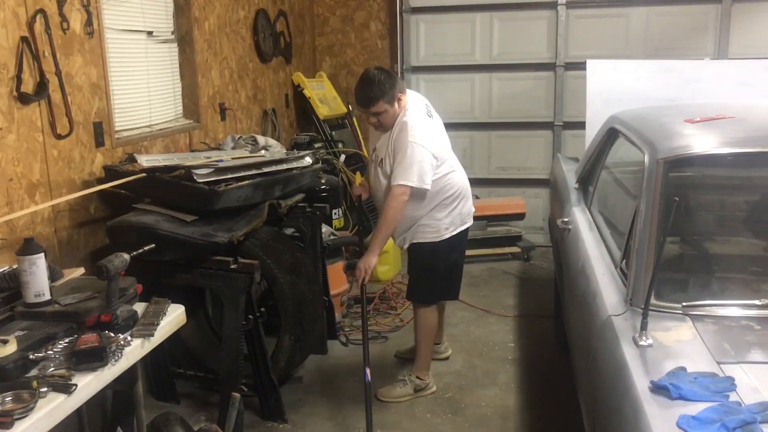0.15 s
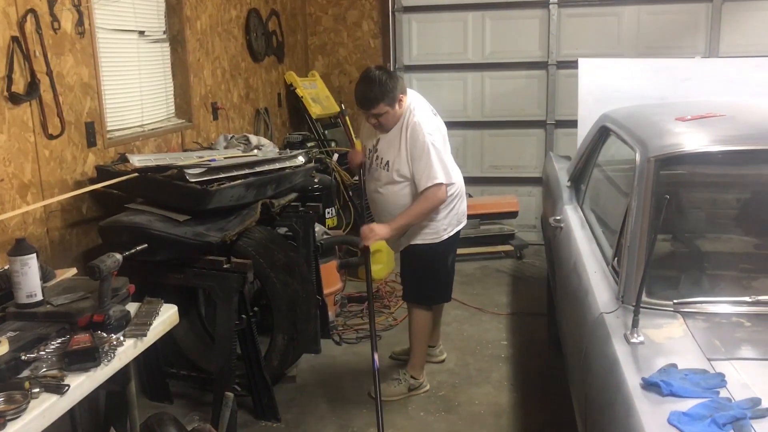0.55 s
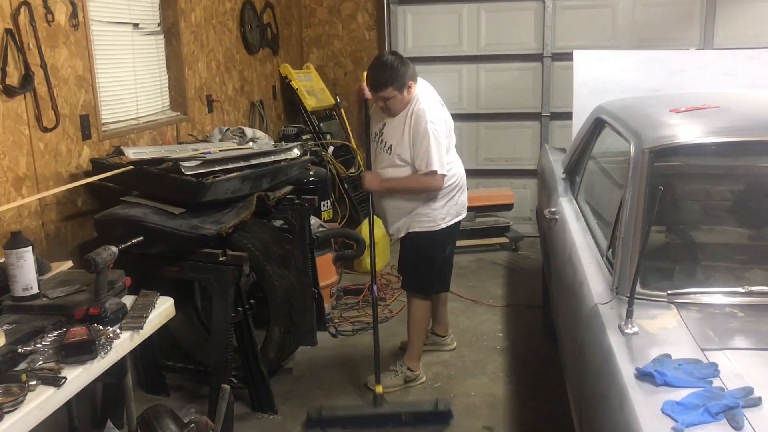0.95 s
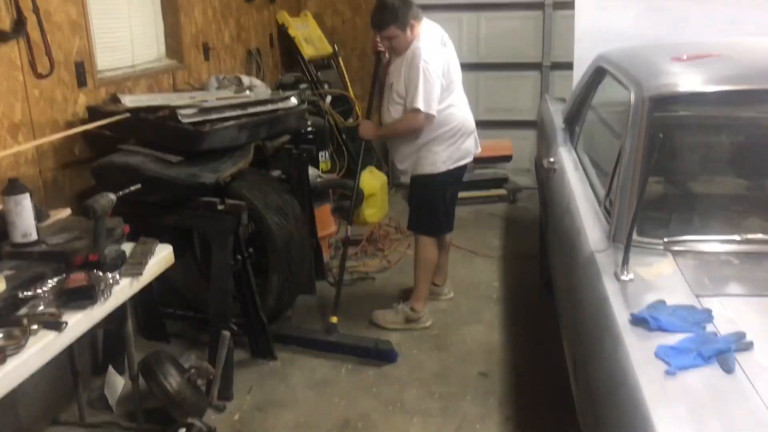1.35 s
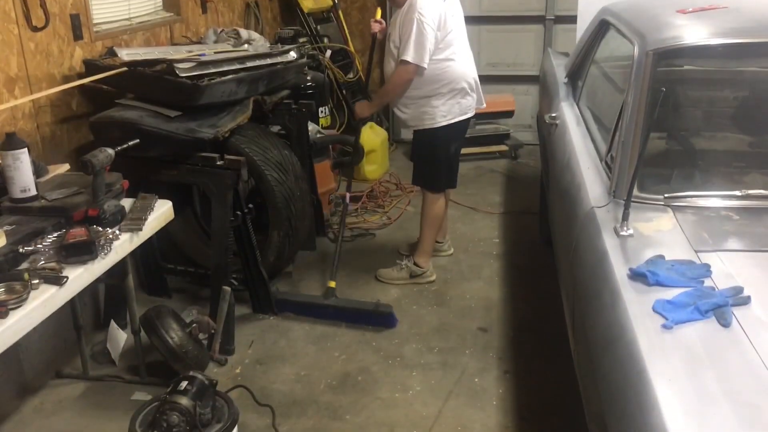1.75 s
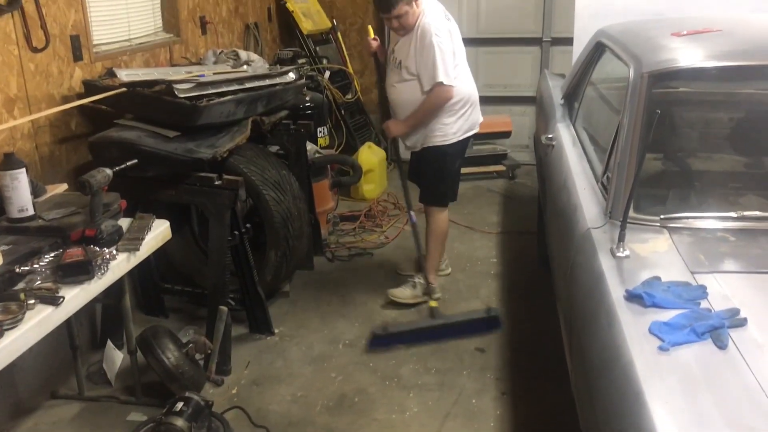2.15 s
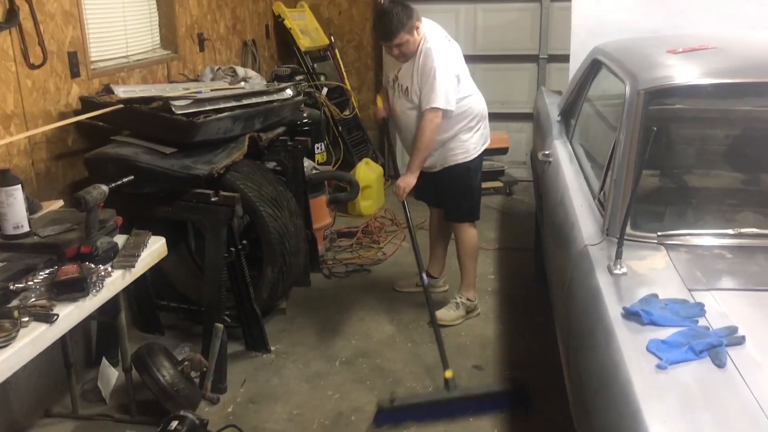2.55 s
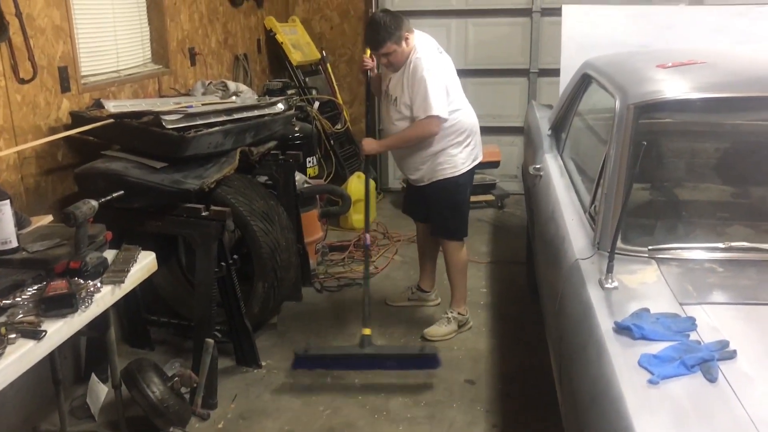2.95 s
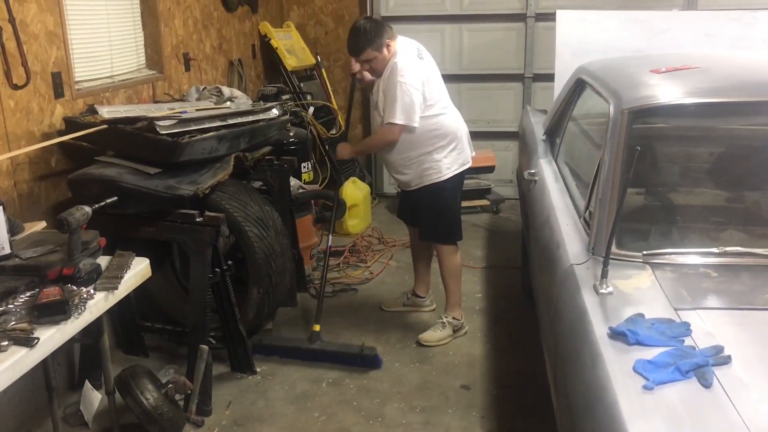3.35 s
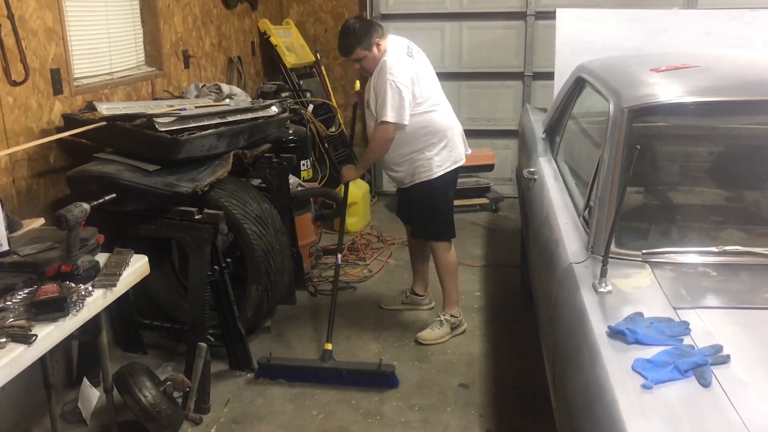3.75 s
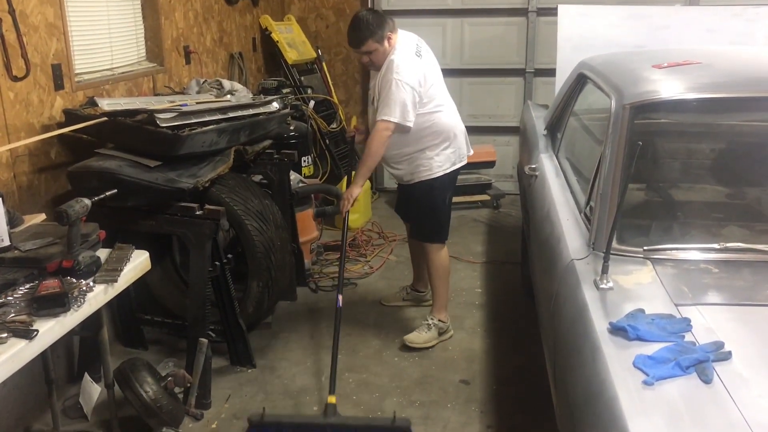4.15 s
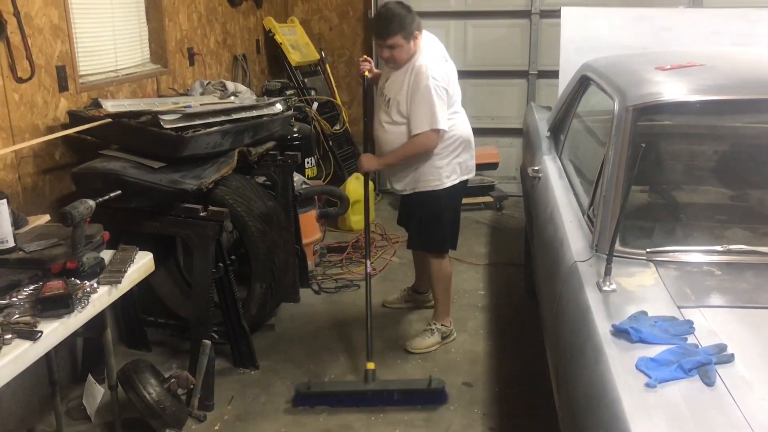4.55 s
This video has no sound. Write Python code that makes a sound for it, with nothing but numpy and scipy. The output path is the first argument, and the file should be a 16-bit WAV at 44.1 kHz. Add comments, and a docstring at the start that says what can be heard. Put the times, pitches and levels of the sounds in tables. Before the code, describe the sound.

One microphone in a hard, lightly echoing garage picks up a person sweeping. Three crisp, bright swishes of stiff bristles are spaced by quieter rasping drags. Bristles tick after the first; a hollow heel and gritty sole sound before the second; a sharper scuff follows later. The broom head finally smacks the floor. A low drone and a faint rising engine stay far behind.

```python
"""A stiff push broom sweeps a concrete garage floor: bristles catch and slip in hissing pushes and lighter
drags, as dense random impulses coloured by bands of hiss, tips and head. The head meets the floor in decaying
bursts of noise, and snapping bristles tick as resonances. The sweeper's heel rings as a set of modes, and soles
scuff on grit. Outside, a distant engine, a sine, climbs in pitch over a narrow-band drone and still air.
One microphone hears it all, with a small room's decaying-noise echoes around broom and shoes."""
import sys
import numpy as np
from scipy import signal
from scipy.fft import rfft, irfft, next_fast_len
from scipy.io import wavfile
from scipy.ndimage import uniform_filter1d, map_coordinates

SR = 44100
rng = np.random.default_rng(int(sys.argv[2]) if len(sys.argv) > 2 else 0)


def unload_wav(signal):
    """Save mono or channel-first audio to the path in sys.argv[1] as 16-bit WAV at rate SR, clipped to [-1, 1]."""
    wavfile.write(
        sys.argv[1],
        SR,
        np.round(np.clip(np.atleast_2d(signal).T, -1, 1) * 32767).astype(np.int16),
    )


N = 208063  # samples

# Spectra: columns f/Hz, relative level per Hz/dB
# Still air of the garage
AIR_SPECTRUM = [(15, -72), (25, -36), (44, -12.5), (70, -5.5), (166, -19), (270, -16.5), (317, -18),
                (416, -25), (451, -31.5), (591, -28), (659, -29), (1040, -29), (3430, -38), (4870, -43.5),
                (10000, -47.5), (16000, -43)]
# Soles on grit, before each scuff's shift in pitch
SOLE_SPECTRUM = [(150, -30), (450, -14.5), (850, -9.5), (1150, -0.5), (1500, -4), (2000, -3.5), (2400, -6),
                 (2900, -9.5), (4500, -20), (9000, -22), (15000, -23)]
# The head's weight on the slab
THUMP_SPECTRUM = [(30, -23), (78, 1), (135, -6), (185, -11), (260, -9.5), (450, -16), (900, -35)]
# Bristles striking the floor
CRASH_SPECTRUM = [(880, -22), (1500, -3.5), (1870, -10), (2060, -7), (2770, -11.5), (4290, -9), (6830, -13),
                  (7760, -20.5), (9470, -12.5), (10700, -16), (16000, -14.5)]
# Broom head scraping
SCRAPE_SPECTRUM = [(100, -40), (250, -12.5), (480, -14.5), (650, -12), (850, -5), (1120, -1), (1450, -4),
                   (1950, -1), (2500, -4), (3300, -7.5), (6000, -22)]
# Very tips of the bristles
TIPS_SPECTRUM = [(8500, -26.5), (10300, -5.5), (11200, 2), (12800, 2.5), (14200, 3), (15800, -3.5)]
# Bristles sliding
HISS_SPECTRUM = [(1500, -30), (2500, -7.5), (3050, -10), (3600, -4), (4150, -1.5), (4600, -4), (5050, -6),
                 (5900, -1.5), (6600, -4.5), (7700, -8.5), (9000, -5.5), (9900, -7.5), (10600, -14.5),
                 (12000, -40)]

# Modes: columns f/Hz, width/Hz, relative level/dB
# Heel of the shoe
HEEL_MODES = [(220.2, 140, -14), (338, 160, -3), (455, 69, -2), (597, 42, -1), (794, 150, -11),
              (3290, 260, -9)]
# Knock of the broom block
BLOCK_MODES = [(715, 200, -2.5), (945, 150, 2), (1220, 230, 4.5), (1410, 220, -1.5), (2210, 670, -12)]

# Distant engine: columns t/s, firing rate f/Hz, rms level/dB
ENGINE_COURSE = [(.4, 57.13, -72), (.5, 58.63, -57.5), (.9, 59.96, -54.5), (1.5, 67.27, -53),
                 (1.8, 72.35, -61.5), (2.4, 78.7, -61.5), (3.3, 86, -71)]
# Swelling and sinking low drone: columns t/s, level/dB
DRONE_LEVELS = [(0, -63.5), (1.5, -57.5), (2.6, -64), (3.12, -55), (3.27, -62), (3.46, -52), (3.9, -72),
                (4.6, -70)]
# Reverberation of the garage: columns f/Hz, t60/s
GARAGE_DECAY = [(150, 0.53), (1000, 0.62), (4000, 0.6), (8000, 0.28), (15000, 0.14)]
# One heel coming down: t/s, level/dB, t60/s
HEEL_STRIKE = (1.9146, -35.5, 0.15)
# Soles dragging over grit: columns t/s, level/dB, rise/s, t60/s, brightness (pitch ratio)
SOLE_SCUFFS = [(.74, -46.5, 0.08, 0.33, 0.65), (.863, -44.5, 0.018, 0.22, 0.71),
               (1.922, -39.5, 0.0071, 0.19, 0.83), (1.935, -33.5, 0.018, 0.13, 0.82),
               (2.97, -60, 0.001, .06, 1.2), (3.644, -41, .002, 0.3, 0.91), (3.665, -28, 0.0028, 0.15, 1.1),
               (3.69, -39.5, 0.073, 0.51, 0.98)]
# The head meeting the floor: columns t/s, crash level/dB, knock level/dB, thump level/dB
HEAD_LANDINGS = [(.634, -56, -52, -66), (3.2606, -42, -52.5, -73), (3.394, -44.5, -50, -58.5),
                 (4.6281, -34, -37.5, -58), (4.6417, -30, -37.5, -41.5)]
# Bent bristles snapping free: columns t/s, level/dB, f/Hz
BRISTLE_FLICKS = [(0.289, -29, 8450), (0.298, -32, 8700), (0.384, -31, 5560), (0.4074, -40, 10700),
                  (0.4274, -41, 5550), (0.4434, -41, 11000), (0.4584, -40, 9360), (0.526, -43, 5880)]
# Bristles that quiver and ring: columns t/s, level/dB, rise/s, t60/s, f/Hz, width of each of two passes/Hz
BRISTLE_RINGS = [(.33, -52.5, 0.054, 1, 7230, 500), (.35, -49, 0.05, 0.63, 9300, 800),
                 (.39, -49, 0.026, 0.5, 11140, 700), (3.48, -54, 0.031, 1, 6140, 900)]
# Light drags between pushes: columns start t/s, attack/s, end t/s, t60/s, hiss level at start/dB,
# swell/(dB/s), head scrape relative to hiss/dB, tips relative to hiss/dB
LIGHT_DRAGS = [(.628, 0.044, 0.83, .19, -45.3, -3, -3, 1.5), (.862, 0.014, 0.89, .18, -50, -6, 1, 2.5),
               (.94, 0.03, 1.046, 0.37, -64, -2, 4, -12), (1.228, 0.054, 1.32, 0.31, -47.5, -1, .5, -8),
               (1.3, .012, 1.515, .3, -53, 25.5, -2.5, 0.5), (1.44, .07, 1.555, 0.42, -49.5, 0.5, 1, -4),
               (1.6, .05, 1.72, .2, -61.5, 2, -7, -1), (1.679, 0.078, 1.997, 0.22, -50, 9, -4.5, -2),
               (2.022, 0.027, 2.42, 0.46, -42.5, -17, -4.5, -1.5),
               (3.26, 0.046, 3.32, 0.19, -48.5, -3, 3.5, -1), (3.395, .015, 3.46, 0.38, -53, 0, 6, 2.5),
               (3.455, 0.061, 4.04, .45, -43.5, -9, -11.5, -2), (4.36, .05, 4.87, .3, -75.5, 20, -2, 2)]
# Forward pushes: columns full speed from t/s, slowing from t/s, hiss level at full speed/dB,
# gain while speeding up/(dB/s), loss while slowing/(dB/s)
FORWARD_PUSHES = [(0.142, 0.237, -36.5, 16.5, 53), (2.585, 2.646, -35, 71.5, 162),
                  (4.158, 4.211, -35, 50.5, 152)]

AIR_DB = -59  # rms level
DRONE_HZ, DRONE_WIDTH_HZ = 60.8, 5.8
PUSH_SCRAPE_DB, PUSH_TIPS_DB = -8, -0.5  # relative to the hiss, at full speed
SCRAPE_GROWS, TIPS_GROW = 0.75, 1.25  # dB for each dB of hiss: a faster push is brighter
TOP_HZ = 15900  # upper band limit


def amp(db):
    """Level to amplitude: 20 dB is a factor of ten."""
    return 10 ** (np.asarray(db) / 20)


def unit(x):
    """Normalisation to an rms of 1."""
    return x / np.sqrt(np.mean(x ** 2) + 1e-20)


def along(points, hz):
    """Interpolation of (f/Hz, value) points on a logarithmic frequency axis."""
    f, value = np.transpose(points)
    return np.interp(np.log(hz + 1), np.log(f + 1), value)


def curves(rows):
    """Linear interpolation in time: one value per sample for each column after t/s."""
    s, *columns = np.transpose(rows)
    t = np.arange(N) / SR
    return [np.interp(t, s, column) for column in columns]


def wobble(rate):
    """Smooth random fluctuation: a spline through random knots, rate of them a second."""
    knots = rng.standard_normal(int(N * rate / SR) + 4)
    return map_coordinates(knots, [np.arange(N) * rate / SR])


def filtered(x, response):
    """Linear filtering: the spectrum of x multiplied by a response of frequency."""
    size = next_fast_len(N + SR // 2)
    spectrum = rfft(x, size) * response(np.fft.rfftfreq(size, 1 / SR))
    return irfft(spectrum, size)[:N]


def coloured(x, spectrum, shift=1):
    """Spectral shaping by a (f/Hz, level/dB) curve moved by a pitch ratio, at rms 1."""
    return unit(filtered(x, lambda hz: amp(along(spectrum, hz / shift))))


def resonant(x, modes):
    """Modal superposition: x rings through damped resonances of alternating sign, at rms 1."""
    def body(f):
        total = 0
        for k, (centre, width, db) in enumerate(modes):
            damping = 1j * f * width
            total = total + (-1) ** k * amp(db) * damping / (centre * centre - f * f + damping)
        return total
    return unit(filtered(x, body))


def grit(rate):
    """Stick-slip as shot noise: tiny slips of random size, rate a second, at steady power."""
    chance = np.clip(rate / SR, 1e-4, 1)
    slips = rng.random(N) < chance
    return slips * rng.standard_normal(N) / np.sqrt(chance)


def burst(s, rise, t60):
    """Exponential decay: a contact builds up linearly from time s, then loses 60 dB in t60."""
    t = np.arange(N) / SR - s
    fall_db = -60 * np.maximum(t - rise, 0) / t60
    return np.clip(t / rise, 0, 1) * amp(fall_db)


def background():
    """Phase accumulation: a sine follows the engine's firing rate, over resonant drone and coloured air."""
    firing_hz, engine_db = curves(ENGINE_COURSE)
    phase = 2 * np.pi * np.cumsum(firing_hz) / SR
    engine = amp(engine_db) * np.sqrt(2) * np.sin(phase)
    hum = resonant(rng.standard_normal(N), [(DRONE_HZ, DRONE_WIDTH_HZ, 0)])
    drone = amp(curves(DRONE_LEVELS)[0]) * hum
    air = amp(AIR_DB) * coloured(rng.standard_normal(N), AIR_SPECTRUM)
    return engine + drone + air


def garage(x):
    """Diffuse reverberation of broom and shoes: noise tails in which each frequency has its own decay."""
    hop = SR // 6
    out = np.zeros(N + 2 * SR)
    padded = np.pad(x, (hop, 2 * hop))
    fade = np.sin(np.pi * np.arange(2 * hop) / (2 * hop))  # overlapping pieces keep constant power
    for start in range(0, N + hop, hop):
        # a fresh noise tail for each short overlapping piece
        hz, t, z = signal.stft(rng.standard_normal(SR // 2), SR, nperseg=256)
        fall_db = -60 * t / along(GARAGE_DECAY, hz)[:, None]
        tail = signal.istft(z * amp(fall_db), SR, nperseg=256)[1]
        piece = padded[start:start + 2 * hop] * fade
        echo = signal.fftconvolve(piece, tail / np.linalg.norm(tail))
        out[start:start + len(echo)] += echo
    return out[hop - SR // 250:][:N]  # echoes start 4 ms late


def shoes():
    """Impact and friction: a heel's modes ring in a hollow clop; soles grind over loose grit."""
    s, db, t60 = HEEL_STRIKE
    clop = resonant(rng.standard_normal(N), HEEL_MODES)
    out = amp(db) * burst(s, rise=0.00086, t60=t60) * clop
    for s, db, rise, t60, brightness in SOLE_SCUFFS:
        out += amp(db) * burst(s, rise, t60) * coloured(grit(9000), SOLE_SPECTRUM, brightness)
    return out


def landings():
    """Impact excitation: the bristles crash onto the floor, the block knocks and its weight thumps."""
    crash = coloured(grit(18000), CRASH_SPECTRUM)
    knock = resonant(grit(20000), BLOCK_MODES)
    thump = coloured(rng.standard_normal(N), THUMP_SPECTRUM)
    out = np.zeros(N)
    for s, crash_db, knock_db, thump_db in HEAD_LANDINGS:
        out += amp(crash_db) * burst(s, rise=0.00039, t60=0.027) * crash  # first touch
        out += amp(crash_db - 2.5) * burst(s, rise=0.0022, t60=0.22) * crash  # the tufts splay
        out += amp(knock_db) * burst(s, rise=0.0035, t60=0.3) * knock
        out += amp(thump_db) * burst(s, rise=0.015, t60=0.64) * thump
    return out


def flicks():
    """Elastic release: single bristles spring back with a short, high tick; others swell and ring on."""
    out = np.zeros(N)
    for s, db, hz in BRISTLE_FLICKS:
        tick = resonant(rng.standard_normal(N), [(hz, 2200, 0)])
        out += amp(db) * burst(s, rise=0.0008, t60=0.019) * tick
    for s, db, rise, t60, hz, width in BRISTLE_RINGS:
        mode = [(hz, width, 0)]
        ring = resonant(resonant(grit(900), mode), mode)
        out += amp(db) * burst(s, rise, t60) * ring
    return out


def patchy(x, depth_db):
    """Time-varying colour: the spectrum drifts as the tufts meet new patches of floor."""
    z = signal.stft(x, nperseg=512)[2]
    field = uniform_filter1d(rng.standard_normal(z.shape), size=7, axis=0)  # smooth in frequency
    field = uniform_filter1d(field, size=12, axis=1)  # smooth in time
    return unit(signal.istft(z * amp(depth_db * unit(field)), nperseg=512)[1][:N])


def drag(start, attack, end, t60, db, swell_db_per_s, scrape_db, tips_db):
    """Sliding contact: bristles touch, slide and lift; the broom's tilt shares out hiss, tips and head."""
    t = np.arange(N) / SR
    swell_db = swell_db_per_s * (np.clip(t, start, end) - start)
    lift_db = -60 * np.maximum(t - end, 0) / t60
    slide = np.clip((t - start) / attack, 0, 1) * amp(db + swell_db + lift_db)
    return np.outer(amp([0, tips_db, scrape_db]), slide)


def push(full, slowing, db, gain_db_per_s, loss_db_per_s):
    """Speed-dependent friction: the broom speeds up, runs and slows; hiss, tips and head follow."""
    t = np.arange(N) / SR
    speeding_db = -gain_db_per_s * np.maximum(full - t, 0)
    slowing_db = -loss_db_per_s * np.maximum(t - slowing, 0)
    speed_db = speeding_db + slowing_db
    tips_db = PUSH_TIPS_DB + TIPS_GROW * speed_db
    scrape_db = PUSH_SCRAPE_DB + SCRAPE_GROWS * speed_db
    return amp(db + np.array([speed_db, tips_db, scrape_db]))


def sweep():
    """Stick-slip friction: a harder push makes more slips per second, and the head rasps below them."""
    pushes = [push(*row) for row in FORWARD_PUSHES]
    drags = [drag(*row) for row in LIGHT_DRAGS]
    hiss, sizzle, scrape = np.linalg.norm(np.array(pushes + drags), axis=0)  # strokes add in power
    slips = 14000 + 14000 * hiss / hiss.max()  # per second
    chatter_db = 0.2 * wobble(40) + 0.13 * wobble(240)  # tufts let go together
    bristles = hiss * patchy(coloured(grit(slips), HISS_SPECTRUM), depth_db=0.73)
    tips = sizzle * patchy(coloured(grit(slips), TIPS_SPECTRUM), depth_db=0.5)
    head = scrape * coloured(grit(slips), SCRAPE_SPECTRUM)
    return amp(chatter_db) * (bristles + tips + head)


def scene():
    """Superposition: direct sound, room echoes and background add, the same in both channels."""
    broom = sweep()
    contacts = flicks() + landings() + shoes()
    echoes = garage(amp(-11.5) * broom + amp(-5.5) * contacts)
    mono = broom + contacts + echoes + background()
    return np.array([mono, mono])


def record(dry):
    """Band limiting: nothing at or above TOP_HZ is kept."""
    return np.array([filtered(channel, lambda hz: hz < TOP_HZ) for channel in dry])


dry = scene()
out = record(dry)
unload_wav(out)
```